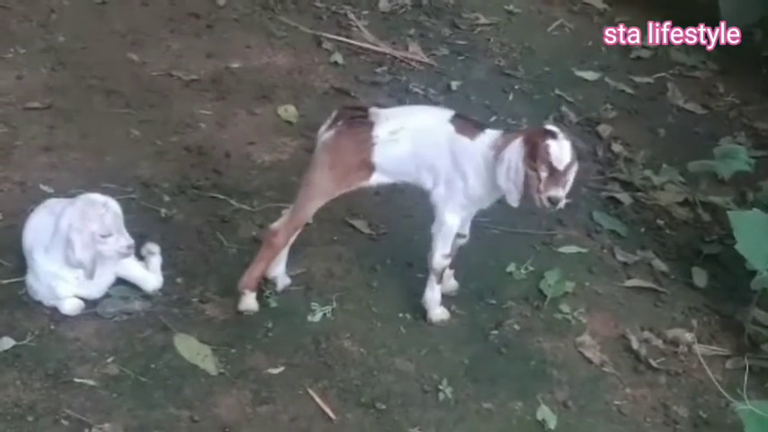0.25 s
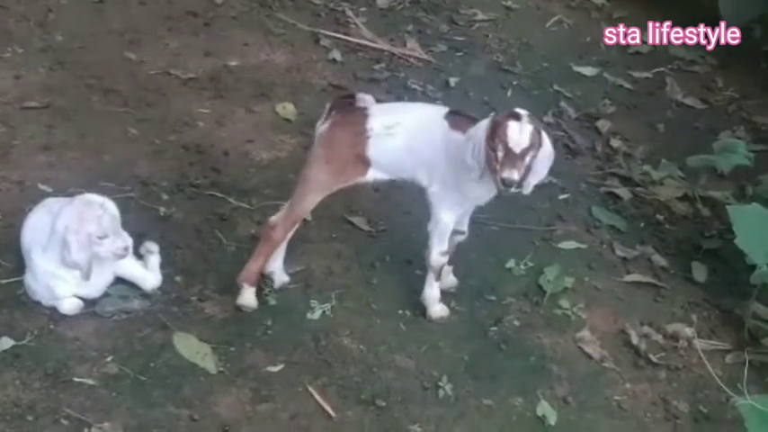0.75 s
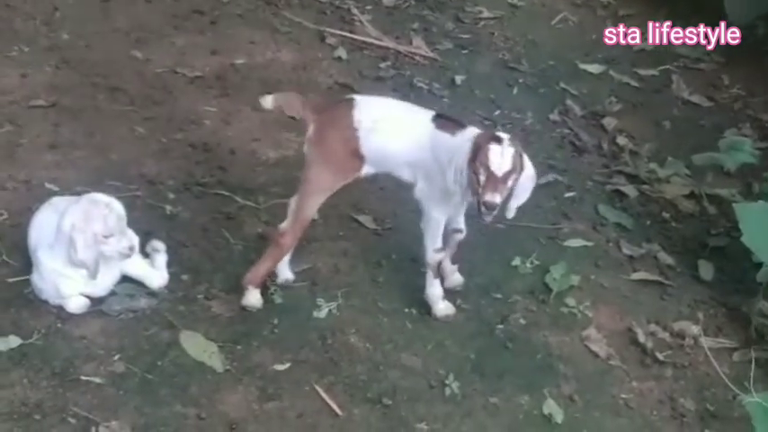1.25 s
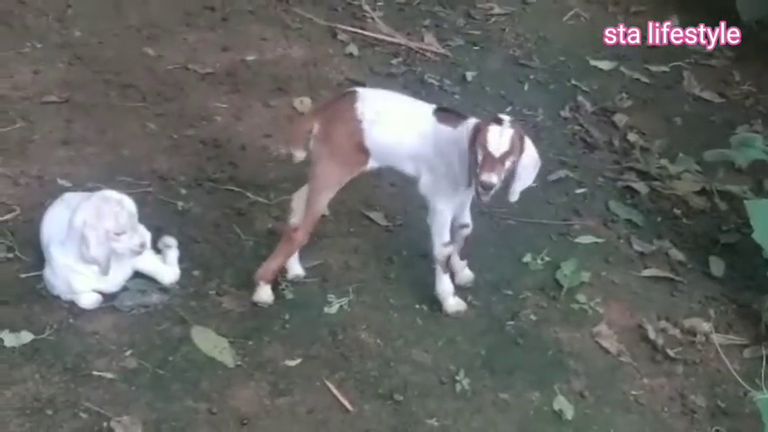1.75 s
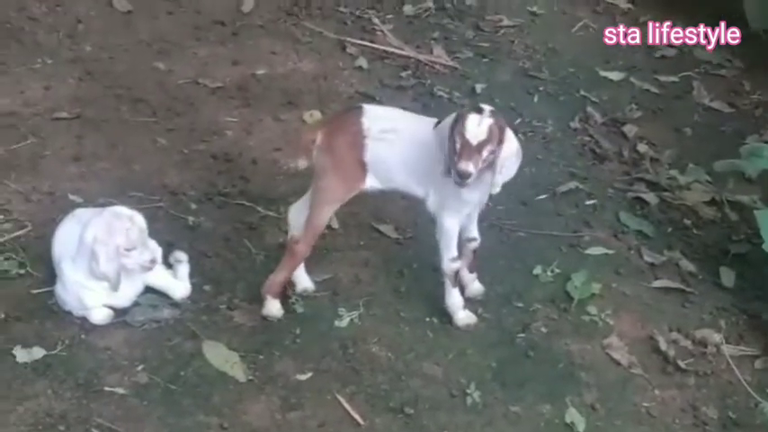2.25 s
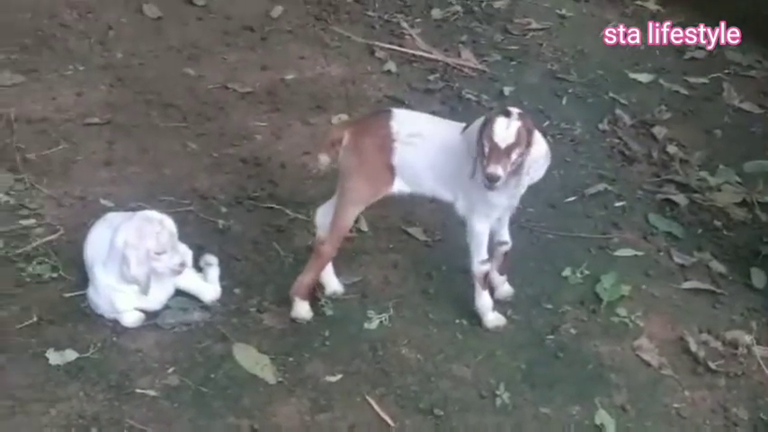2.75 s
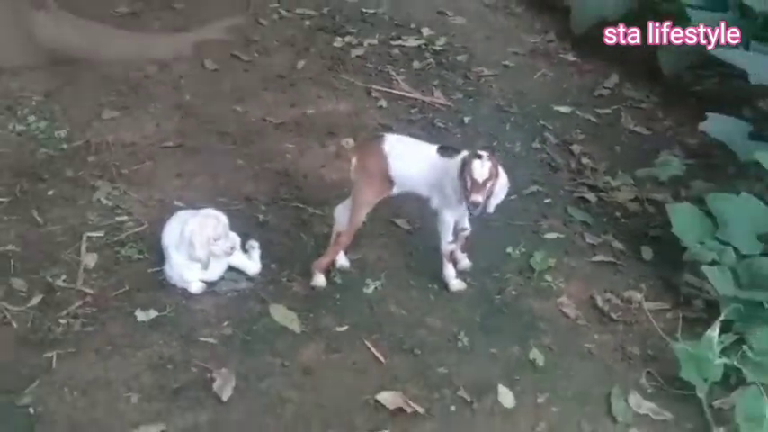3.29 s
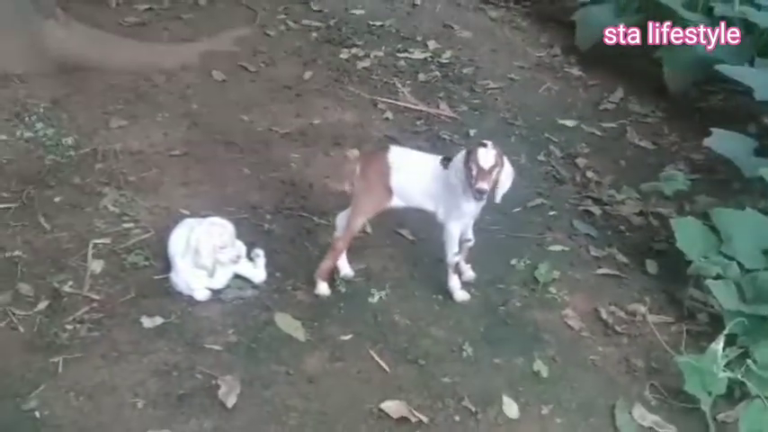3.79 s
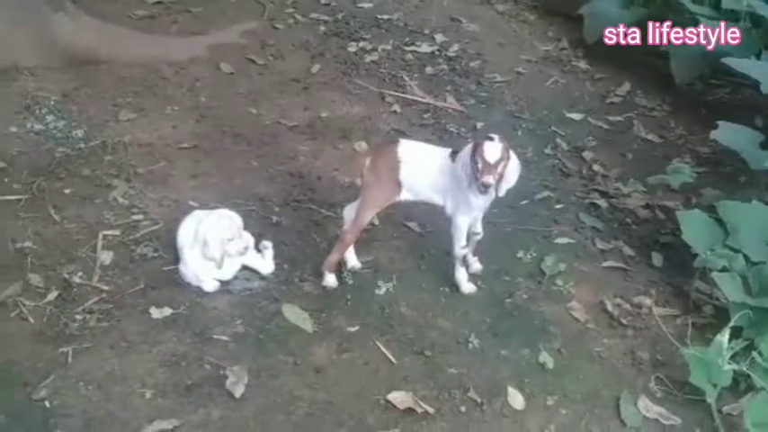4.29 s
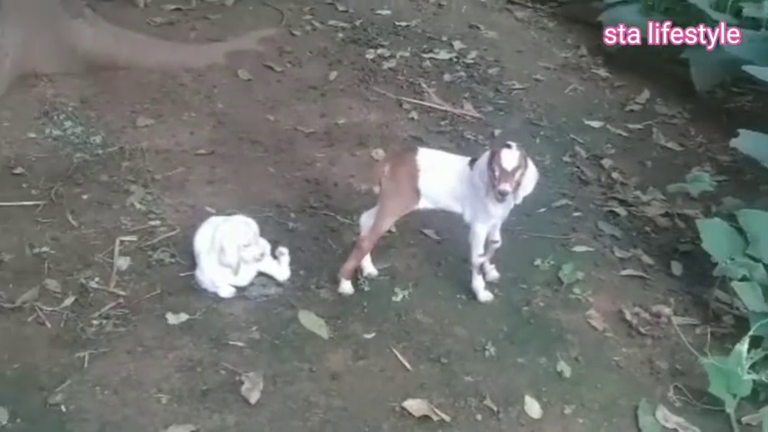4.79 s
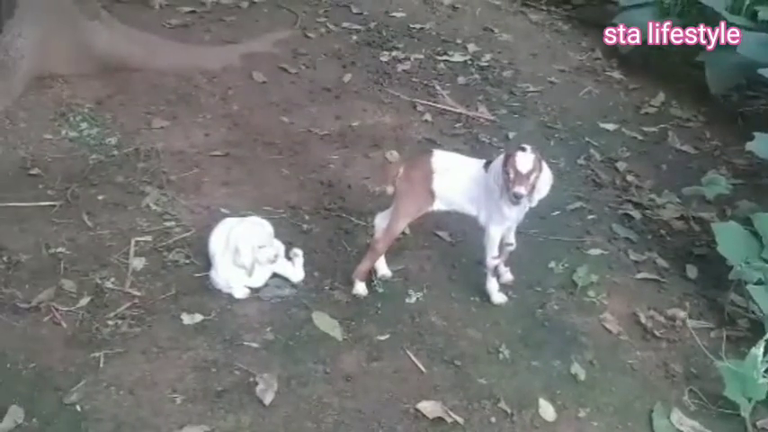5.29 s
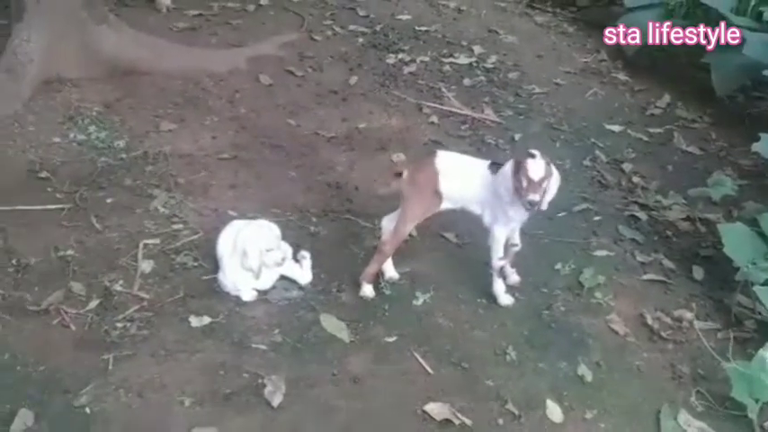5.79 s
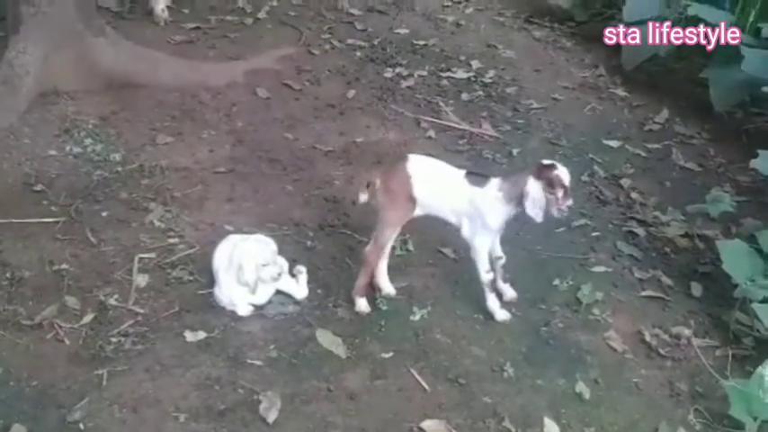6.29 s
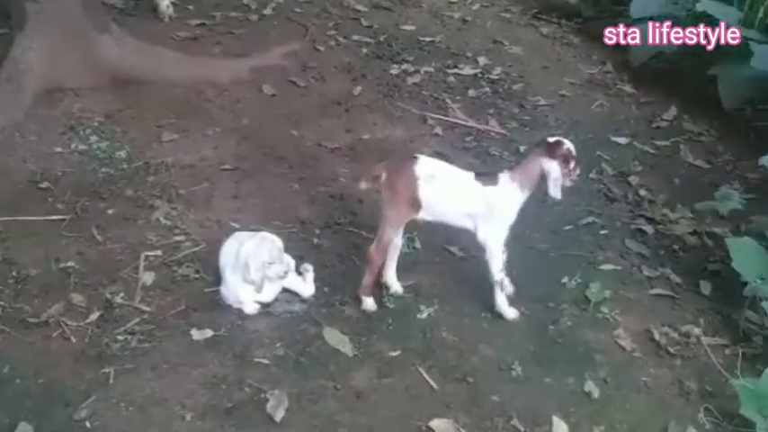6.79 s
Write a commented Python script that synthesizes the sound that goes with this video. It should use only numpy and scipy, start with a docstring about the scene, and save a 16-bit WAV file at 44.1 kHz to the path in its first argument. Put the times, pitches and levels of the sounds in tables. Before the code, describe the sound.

A quiet outdoor yard, in stereo, with faint soft hiss and low rumble leaning left. From 0 to 1.1 s dry leaves rustle gently, with tiny bird chirps and a faint thin whine cutting off at 0.5 s. At about 1.2 s a goat kid begins a bleat, bursting loud near 1.45 s and fading by 2.25 s: shrill, nasal, around 1 kHz, quavering about ten times a second, raspier between pulses. Dull knocks bump the left microphone at 2.15-2.3 s. A very faint, fuzzy high insect tone runs from 2.25 to 3.2 s. A shorter, somewhat quieter bleat sounds at 3.35-3.75 s. A bird gives quick falling whistles near 4.0, 4.9 and 6.0 s, with faint chirps between and a small tick at 4.3 s. Soft low scuffs come at 5.25 s. A weak, breathy, broken bleat follows at 6.3-6.6 s, then small rustles and a chirp. Short wall echoes surround the bleats.

```python
"""Goat kid in a walled farmyard

Two microphones in the yard: a kid gives three shrill, quavering bleats, made of harmonics and breath
noise sent through three throat resonances, and the walls throw them back as early echoes and a tail.
A bird whistles three falling notes and chirps faintly (gliding sines); a fuzzy high tone is an insect.
Bursts of grainy noise are leaf rustles over a soft hiss, and a thin whine sounds for the first half second.
As the first bleat ends, something knocks against the left microphone: short pressure pulses with a ring."""
import sys
import numpy as np
from scipy import signal
from scipy.fft import rfft, irfft, next_fast_len
from scipy.io import wavfile
from scipy.ndimage import uniform_filter1d

SR = 44100
rng = np.random.default_rng(int(sys.argv[2]) if len(sys.argv) > 2 else 0)


def store_wav(level_fs):
    """Save 16-bit WAV to argv[1]."""
    pcm = np.round(np.clip(np.atleast_2d(level_fs), -1, 1) * 32767)
    wavfile.write(sys.argv[1], SR, pcm.T.astype(np.int16))


N = 310893
TIME = np.arange(N) / SR

# Spectrum of the yard's steady hiss: pitch_hz, relative level_db (per Hz)
HISS_SPECTRUM = [(15, -69), (25, -63), (98, -3.5), (381, -11), (498, -9), (540, -9), (1370, -2),
                 (1750, -9.5), (2980, -5.5), (3790, -5.5), (4960, -17.5), (8460, -20.5), (9160, -24),
                 (13700, -31), (14800, -51)]
# Lean of the hiss, left over right: pitch_hz, difference_db
HISS_LEAN = [(60, 13), (200, 12.5), (370, 10.5), (680, -2), (1300, 1.5), (3000, -0.5), (8000, -4),
             (14000, 3)]
# Likeness of the hiss in the two microphones: pitch_hz, correlation (0-1)
HISS_LIKENESS = [(130, 0.46), (630, 0.58), (1400, 0), (14000, 0.046)]
HISS_DB, HISS_PATCHY_DB = -57.35, 2  # overall rms level, drift of the patches

# Partials of the thin whine at the start: pitch_hz, level_db (before its flutter)
WHINE_PARTIALS = [(2762, -60), (4129, -61.5), (4587, -63.5), (5040, -74), (5959, -67.5), (6900, -71),
                  (7989, -67)]
WHINE_STOP_S, WHINE_FALL_DB_PER_S = 0.5, 450

# Rustles and scuffs in the leaf litter: middle_s, length_s, centre_hz, width_octaves,
# level_db (rms before the swell)
RUSTLES = [(.2, 0.92, 3120, 0.57, -61.5), (0.697, 0.91, 3160, 0.54, -55), (1.106, 0.29, 3160, 0.38, -64),
           (2.633, 0.047, 4480, .7, -64), (2.797, 0.063, 4500, 0.84, -64),
           (3.202, 0.063, 1180, 0.23, -56.5), (4.323, 0.002, 3500, 0.56, -44), (5.244, .08, 557, 1, -55),
           (5.312, 0.076, 714, 1, -55), (6.655, 0.053, 520, 0.22, -59.5), (6.726, 0.034, 2600, 1, -54.5)]

# Shape of the bird's falling whistle: time_s from its middle, pitch_hz, relative level_db
# (times and pitches before each note's own factors)
WHISTLE_SHAPE = [(-.095, 4850, -11), (-.06, 5090, -6.5), (0, 4600, 4.5), (.022, 4180, 4.5),
                 (.042, 3520, 8.5), (.1, 2546, -3.5)]
# Each whistle: middle_s, level_db (added to the shape), length_factor, pitch_factor
WHISTLES = [(4.028, -52, 0.84, 0.96), (4.875, -49.5, 1.0, 0.98), (5.957, -52.5, 0.96, 0.97)]
# Faint chirps: start_s, length_s, start_pitch_hz, end_pitch_hz, level_db (before the stereo trim)
CHIRPS = [(0.084, 0.068, 6320, 5800, -62), (.165, 0.075, 2266, 2090, -55),
          (0.451, 0.049, 2136, 2100, -50.5), (0.681, 0.041, 2530, 2405, -51.5),
          (4.235, 0.085, 2470, 2180, -57.5), (4.336, .08, 4280, 4550, -62), (4.558, 0.16, 4070, 4500, -64),
          (5.779, 0.03, 4180, 4770, -56), (6.78, 0.083, 4340, 4520, -58)]
# Decay of the yard's tail before its stretch factor: pitch_hz, t60_s
YARD_T60 = [(300, 0.1), (2000, 0.56), (5000, 0.52), (12000, 0.22)]

# The kid's throat in three parts: pitch_hz, relative level_db
# (the first two are moved by each bleat's size factor)
MOUTH_RESONANCE = [(500, -82), (950, -30), (1200, 5), (1500, -12), (1750, -26.5), (2000, 4), (2350, 3.5),
                   (2900, -17.5), (3300, -3.5), (4200, -35.5)]
SHRILL_RESONANCE = [(3000, -62), (3450, -21), (3900, -4), (4200, -0.5), (4650, 8), (4950, -2), (5300, 1),
                    (5750, 1.5), (6200, -15), (7000, -52)]  # the main one
OVERTONE_RESONANCE = [(5500, -11), (6300, 8), (6700, 2.5), (7600, 2.5), (8300, -5), (9200, -0.5),
                      (10200, -7.5), (11600, -10.5), (13000, -25.5), (14500, -45.5)]
# Push of breath behind each bleat, beneath its quaver: time_s, effort_db
PUSH_LONG = [(1.19, -66), (1.24, -54), (1.33, -47), (1.442, -43.5), (1.468, -22), (1.76, -22.5),
             (1.87, -24), (2.075, -29.5), (2.19, -43.5), (2.27, -67)]
PUSH_SHORT = [(3.323, -55), (3.342, -37.5), (3.38, -30.5), (3.57, -27), (3.688, -34.5), (3.735, -46),
              (3.785, -70), (3.821, -76)]
PUSH_SOFT = [(6.234, -63), (6.289, -44), (6.365, -36), (6.41, -26.5), (6.45, -38.5), (6.525, -36.5),
             (6.6, -57.5), (6.66, -66), (6.7, -70)]
# The quaver, a row at each crest: time_s, pitch_hz, mouth_level_db,
# following_dip_factor (on the usual depth), roughness (0-1)
CRESTS_LONG = [(1.252, 1103, -56, 1.3, 0.23), (1.333, 1003, -42, 1.05, 0.09),
               (1.446, 1022, -31.5, 0.88, 0.06), (1.561, 978, -32, 0.82, 0.06), (1.666, 967, -31, 0.55, 0),
               (1.761, 952, -33.5, 0.72, 0.18), (1.865, 960, -32, 0.79, 0), (1.966, 962.3, -34, 1.19, 0.07),
               (2.071, 970, -33.5, 1.37, 0.1), (2.168, 930, -39, 0.68, 0.64)]
CRESTS_SHORT = [(3.362, 959, -30, 1.3, 0.1), (3.465, 978.5, -30.5, 1.06, 0.085),
                (3.564, 998.6, -28, 1.48, 0.058), (3.675, 992.4, -28.5, 1.2, 0.082),
                (3.775, 927, -50, 0.7, 0.78)]
CRESTS_SOFT = [(6.303, 1016, -40.5, 0.96, 0.38), (6.406, 945.3, -38, .85, 0.11),
               (6.519, 977, -39, 0.81, 0.13), (6.631, 1180, -44, 0.79, 0.58)]
# What a usual dip does to each bleat, and how the bleat sets in: effort_drop_db, mouth_drop_db,
# added_roughness (0-1), dip_narrowness (power), opening_yelp (share of pitch), brightness_db
MANNERS = [(8, 18.5, .08, 0.96, 0.068, -13), (11.5, 24, 0.31, 1.4, 0.95, -14),
           (15, 17.5, 0.97, 1.1, 0.25, -19)]
# Voice colour in each bleat: size_factor on the resonances, shrill_lean_db to the left,
# fundamental_db, lower_shrill_flank_db, upper_shrill_peak_db, top_octave_db
POSES = [(1.001, 6.5, -6, 0.5, -4, -0.5), (0.986, 4.5, -3.5, -5, 2.5, 2), (0.983, 4.5, -5, -3.5, -8.5, -4)]
QUAVER_HZ, SAG_SHARE = 9.6, 0.1  # dips a second outside the listed crests, pitch lost in a usual dip
MOUTH_NARROWNESS = 0.87  # below one: the mouth resonance has wide dips
YELP_S = 0.011  # time constant of the opening yelp's fall to pitch
MOUTH_OVER_DB = 13.5  # most the mouth resonance may exceed the main one
BRIGHTEN_DB = 14.5  # overtone gain reached by the end of a bleat
BRIGHT_PER_DB = 0.3946  # overtone gain, relative to the main resonance, per dB below full effort
FULL_EFFORT_DB = -28.5

# Knocks on the left microphone: time_s, peak_db (before the low cut), half_length_s
KNOCKS = [(2.1499, -22, 0.00061), (2.1582, -18, 0.00084), (2.184, -25.5, 0.00023), (2.1914, -14, 0.00092),
          (2.202, -30, 0.0024), (2.211, -28, 0.0013), (2.311, -31.5, 0.00017)]
# Songs of a high insect: start_s, length_s, level_db (rms while held)
INSECT_SONGS = [(2.25, 0.94, -73), (4.913, 0.81, -76.5), (6.1, 0.66, -88)]
EDGE_HZ = 14350  # top of the recorded band


def gain_of(db):
    """Decibels to amplitude."""
    return 10 ** (np.asarray(db) / 20)


def evened(x):
    """Scales to an rms of one."""
    return x / np.sqrt(np.mean(x ** 2) + 1e-20)


def steadied(x, size=500):
    """Holds the running rms near one; size is the window in samples."""
    power = uniform_filter1d(uniform_filter1d(x ** 2, size), size)
    return x / np.sqrt(abs(power) + 1e-12)


def read(points, hz):
    """Reads a table on a log-frequency axis."""
    f, value = np.transpose(points)
    return np.interp(np.log(hz + 1), np.log(f + 1), value)


def coloured(x, points):
    """Filters by a table of pitch_hz and level_db."""
    size = next_fast_len(len(x) + 1024)
    gain = gain_of(read(points, np.fft.rfftfreq(size, 1 / SR)))
    return irfft(rfft(x, size) * gain, size)[:len(x)]


def wander(count, hz):
    """Random drift of rms one, rolling off above a rate of hz."""
    size = next_fast_len(count)
    rolloff = 1 + (np.fft.rfftfreq(size, 1 / SR) / hz) ** 2
    return evened(irfft(rfft(rng.standard_normal(size)) / rolloff, size)[:count])


def add(mix, s, sound):
    """Mixes a sound in at a time in seconds."""
    part = mix[max(round(s * SR), 0):][:len(sound)]
    part += sound[:len(part)]


def low_cut(x, order):
    """Removes what lies below 60 Hz."""
    return signal.sosfilt(signal.butter(order, 60, "high", fs=SR, output="sos"), x)


def hiss():
    """Outdoor hiss: noise in drifting time-frequency patches, with its low rumble on the left."""
    frames, hz = N // 256 + 5, np.fft.rfftfreq(1024, 1 / SR)
    a, b, c, d, patches = rng.standard_normal((frames, len(hz), 5)).T
    patches = uniform_filter1d(uniform_filter1d(patches, size=14, axis=0), size=14, axis=1)
    patches = evened(patches) * (hz / (hz + 1500))[:, None]  # the rumble is steadier than the hiss
    same = np.clip(read(HISS_LIKENESS, hz), -1, 1)[:, None]
    lean = gain_of(read(HISS_LEAN, hz) / 2)[:, None]
    left = a + 1j * b
    right = same * left + np.sqrt(1 - same ** 2) * (c + 1j * d)
    z = np.array([left * lean, right / lean])
    z *= gain_of(read(HISS_SPECTRUM, hz)[:, None] + HISS_PATCHY_DB * patches)
    sound = signal.istft(z, nperseg=1024, noverlap=768)[1][:, :N]
    return gain_of(HISS_DB) * evened(low_cut(sound, 4))


def whine(width_hz=10):
    """A few faint sines, made slightly fuzzy by a drifting level, that soon stop."""
    t, out = TIME[:SR], np.zeros((2, N))
    fade = gain_of(-WHINE_FALL_DB_PER_S * np.maximum(t - WHINE_STOP_S, 0))
    for side in out:
        for hz, db in WHINE_PARTIALS:
            flutter = 0.46 + 0.92 * wander(len(t), width_hz)
            tone = np.sin(2 * np.pi * (hz * t + rng.random()))
            add(side, 0, fade * gain_of(db) * flutter * tone)
    return out


def rustles():
    """Short swells of band-limited, grainy noise from dry leaves and soil."""
    out = np.zeros((2, N))
    for s, length, hz, octaves, db in RUSTLES:
        count = int(length * SR) + 64
        distance = np.log2((np.fft.rfftfreq(count, 1 / SR) + 1) / hz)  # octaves from the centre
        band = np.exp(-0.5 * abs(distance / octaves) ** 3)
        swell = np.hanning(count) ** 0.5
        for side in out:
            grains = rng.standard_normal(count) * gain_of(2.6 * wander(count, 66))
            noise = evened(irfft(rfft(grains) * band, count))
            add(side, s - length / 2, gain_of(db) * noise * swell)
    return out


def bird(overtone_db=-28, echo_db=-3):
    """Near-sine whistles that fall about an octave, and short gliding chirps, with a short echo."""
    song = np.zeros(N)
    at, pitch, shape_db = np.transpose(WHISTLE_SHAPE)
    for s, db, stretch, lift in WHISTLES:
        t = np.arange(at[0], at[-1], 1 / (SR * stretch))
        hz = lift * np.interp(t, at, pitch) * (1 + 0.0057 * wander(len(t), 140))
        phase = 2 * np.pi * np.cumsum(hz) / SR
        note = np.sin(phase) + gain_of(overtone_db) * np.sin(2 * phase)
        note = note * gain_of(3.7 * wander(len(t), 57))
        add(song, s + at[0] * stretch, gain_of(db + np.interp(t, at, shape_db)) * note)
    for s, length, start_hz, end_hz, db in CHIRPS:
        hz = np.linspace(start_hz, end_hz, int(length * SR))
        hz = hz * (1 + 0.02 * wander(len(hz), 150))
        chirp = np.sin(2 * np.pi * np.cumsum(hz) / SR) * signal.windows.tukey(len(hz), 0.7)
        add(song, s, gain_of(db) * chirp)
    stereo_trim_db = [[-2], [-1]]
    return song * gain_of(stereo_trim_db) + gain_of(echo_db) * yard(song, stretch=0.6)


def yard(x, stretch=0.96):
    """A short diffuse tail of sparse random echoes, starting after 12 ms, whose bass and treble die before the
    middle."""
    shape = (2, SR // 2)
    taps = rng.standard_normal(shape) * (rng.random(shape) < 0.06) * (TIME[:SR // 2] > 0.012)
    hz, t, z = signal.stft(taps, SR, nperseg=256)
    z = z * gain_of(-60 * t / (stretch * read(YARD_T60, hz)[:, None]))
    tail = signal.istft(z, SR, nperseg=256)[1]
    return signal.fftconvolve(x[None], tail / np.linalg.norm(tail[0]), axes=1)[:, :N]


def goat():
    """The three bleats; the main resonance is louder on the left, the overtones on the right."""
    voice, left, right = np.zeros((3, N))
    pushes = (PUSH_LONG, PUSH_SHORT, PUSH_SOFT)
    crest_tables = (CRESTS_LONG, CRESTS_SHORT, CRESTS_SOFT)
    for push, crests, manner, pose in zip(pushes, crest_tables, MANNERS, POSES):
        size, lean_db, *colour_db = pose
        s, sound = bleat(push, crests, manner, size, *colour_db)
        # pitch_hz, gain_db on the left and cut on the right
        lean = np.array([(1000, 1.5), (2000, 0.6), (2900, -2.5), (3900, 2.5), (4700, lean_db),
                         (6000, -1.0), (7800, -4.0), (10000, 0.0), (13000, 2.0)])
        add(voice, s, sound)
        add(left, s, coloured(sound, lean))
        add(right, s, coloured(sound, lean * [1, -1]))
    # the yard returns mostly the shrill part
    thrown = coloured(voice, [(1000, 0), (2000, -4.5), (4500, 0.5), (14000, 3.5)])
    direct = np.array([left, phase_shifted(right)])
    return direct + gain_of(-7) * reflections(thrown) + gain_of(-15) * yard(thrown)


def bleat(push, crests, manner, size, fundamental_db, lower_db, upper_db, top_db,
          rough_jitter=0.038, jitter_hz=200, air_db=-1, mouth_noise=0.27, high_noise=1.4):
    """Vocal folds, cleaner on the crests and raspier between, sound through three throat resonances."""
    t = np.arange(push[0][0], push[-1][0], 1 / SR)
    hz, effort_db, mouth_db, bright_db, rough = quaver(t, push, crests, manner)
    jitter = 0.002 + rough_jitter * rough
    turns = np.cumsum(hz * (1 + jitter * wander(len(t), jitter_hz))) / SR
    folds = np.zeros(len(t))
    for k in range(1, 17):
        # random phases spread each pulse out in time, and every harmonic flutters a little
        harmonic = np.cos(2 * np.pi * (k * turns + rng.random()))
        folds += harmonic * gain_of(3.02 * wander(len(t), 36)) * (k * hz < SR / 2)
    tone = (1 - rough) * evened(folds)
    puffs = 1 + 0.5 * np.cos(2 * np.pi * turns)  # one each cycle
    air = evened(puffs * rng.standard_normal(len(t)))
    noise = gain_of(air_db) * (0.008 + rough ** 1.5) * air
    mouth = steadied(coloured(tone + mouth_noise * noise, np.array(MOUTH_RESONANCE) * [size, 1]))
    shrill = steadied(coloured(tone + noise, np.array(SHRILL_RESONANCE) * [size, 1]))
    overtones = steadied(coloured(tone + high_noise * noise, OVERTONE_RESONANCE))
    voice = gain_of(mouth_db) * mouth + shrill + gain_of(bright_db) * overtones
    voice = coloured(voice, [(1150, fundamental_db), (1700, 0), (3000, 0), (3900, lower_db), (4500, 0),
                             (5000, 0), (5800, upper_db), (6700, 0), (9000, 0.0013), (12000, top_db)])
    shimmer = gain_of((0.7 + 3 * rough) * wander(len(t), 70))
    return t[0], gain_of(effort_db) * shimmer * voice * signal.windows.tukey(len(t), 0.02)


def quaver(t, push, crests, manner):
    """Between crests the pitch sags, the level drops, the mouth resonance fades and the voice roughens."""
    drop_db, mouth_drop_db, rasp, narrowness, yelp, tint_db = manner
    s, crest_hz, crest_db, depths, crest_rough = np.transpose(crests)
    outside = t - np.clip(t, s[0], s[-1])  # seconds before the first or after the last crest
    cycle = np.interp(t, s, np.arange(len(s))) + QUAVER_HZ * outside
    swing = np.sin(np.pi * cycle) ** 2  # 0 on a crest, 1 between two
    dip = swing ** narrowness * depths[np.clip(cycle.astype(int), 0, len(s) - 1)]
    age = t - t[0]
    hz = np.interp(t, s, crest_hz) * (1 - SAG_SHARE * dip) * (1 + yelp * np.exp(-age / YELP_S))
    effort_db = np.interp(t, *np.transpose(push)) - drop_db * dip
    mouth_db = np.interp(t, s, crest_db) - mouth_drop_db * swing ** MOUTH_NARROWNESS
    mouth_over_db = np.minimum(mouth_db - effort_db, MOUTH_OVER_DB)
    bright_db = tint_db + BRIGHTEN_DB * (age / age[-1]) ** 2
    bright_db = bright_db + BRIGHT_PER_DB * (FULL_EFFORT_DB - effort_db)
    rough = np.clip(np.interp(t, s, crest_rough) + rasp * dip ** 2, 0, 1)
    return hz, effort_db, mouth_over_db, bright_db, rough


def phase_shifted(x):
    """Turns the treble's phase, so that two microphones agree on low notes and less on high ones."""
    size = next_fast_len(N)
    shift = [(2000, 0.2), (3000, 1.6), (4700, 1.25), (8000, 1.56), (14000, 1.36)]  # pitch_hz, radians
    radians = read(shift, np.fft.rfftfreq(size, 1 / SR))
    return irfft(rfft(x, size) * np.exp(-1j * radians), size)[:N]


def reflections(x, count=10):
    """A few early echoes from the ground and the near walls, weaker the later they come."""
    taps = np.zeros((2, SR // 8))
    for side in taps:
        delay_s = np.geomspace(0.003, 0.03, count) * rng.uniform(0.85, 1.15, count)
        strength = evened(delay_s ** -0.3) / np.sqrt(count)
        side[(delay_s * SR).astype(int)] = rng.choice([-1, 1], count) * strength
    return signal.fftconvolve(x[None], taps, axes=1)[:, :N]


def knocks(right_db=-25, ring_hz=335, ring_t60_s=0.028, ring_db=-10):
    """Each knock pushes the left diaphragm in; it swings back more slowly and the case rings briefly."""
    out, t = np.zeros(N), np.arange(-SR // 50, SR // 20) / SR
    after = np.maximum(t, 0)
    ring = gain_of(ring_db - 60 * after / ring_t60_s) * np.sin(2 * np.pi * ring_hz * after)
    for s, db, half_length in KNOCKS:
        u = t / half_length
        push_in = -np.exp(-3 * abs(u) ** 1.48)
        swing_back = 0.33 * np.exp(-((u - 2.2) / 1.36) ** 2)
        add(out, s + t[0], gain_of(db) * (push_in + swing_back + ring))
    return low_cut(out, 2) * gain_of([[0], [right_db]])


def insect(hz=8500, width_hz=110, fade_share=0.18):
    """A thin high note, fuzzy from a randomly drifting amplitude, that swells, holds and fades."""
    level = np.zeros(N)
    for s, length, db in INSECT_SONGS:
        add(level, s, gain_of(db) * signal.windows.tukey(int(length * SR), fade_share))
    carrier = np.sin(2 * np.pi * hz * TIME)
    return level * np.array([evened(wander(N, width_hz) * carrier) for _ in range(2)])


def scene():
    """Everything in the yard, at the two microphones."""
    return hiss() + whine() + rustles() + bird() + goat() + knocks() + insect()


def record(dry, threshold_db=-25, squeeze=0.07, recovery_db_per_s=150):
    """Gain control takes a small share off whatever exceeds the threshold; then the band limit."""
    power_db = 10 * np.log10(abs(uniform_filter1d((dry ** 2).mean(0), size=200)) + 1e-12)
    fall = TIME * recovery_db_per_s
    held_db = np.maximum.accumulate(power_db + fall) - fall  # jumps up at once, falls steadily
    over_db = np.maximum(held_db - threshold_db, 0)
    ducked = dry / gain_of(squeeze * uniform_filter1d(over_db, size=200))
    band = signal.firwin(511, EDGE_HZ, window=("kaiser", 9), fs=SR)
    return signal.oaconvolve(ducked, band[None], "same")


dry = scene()
out = record(dry)
store_wav(out)
```